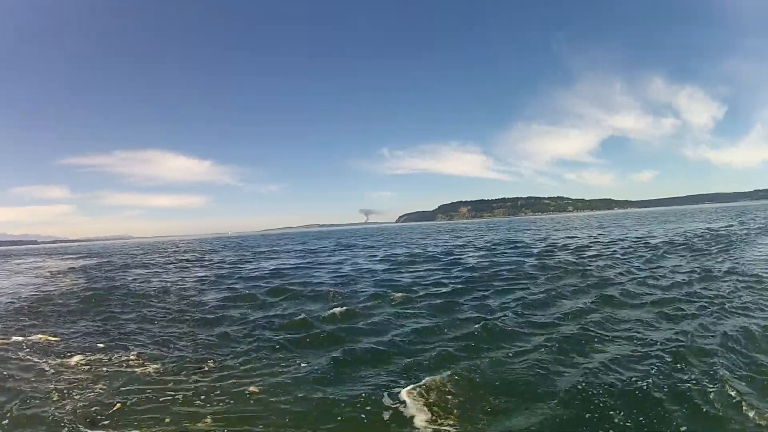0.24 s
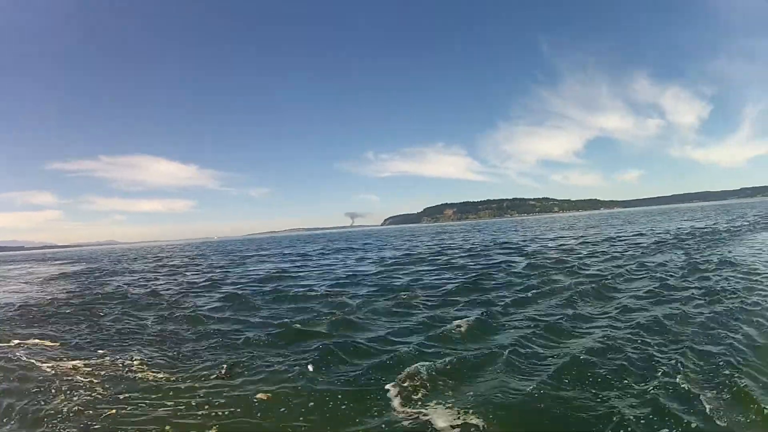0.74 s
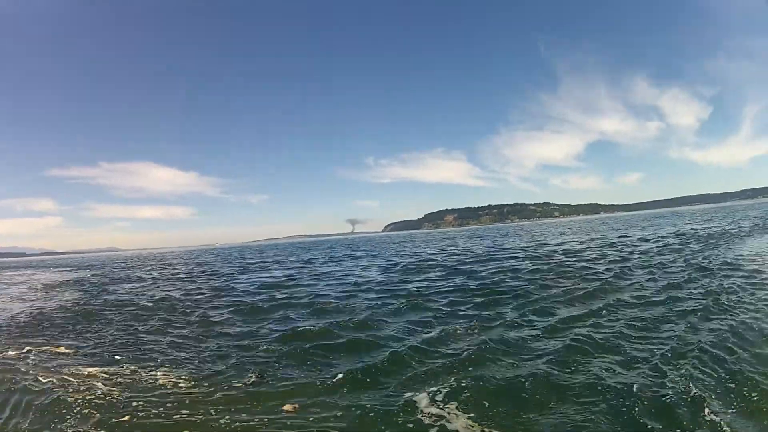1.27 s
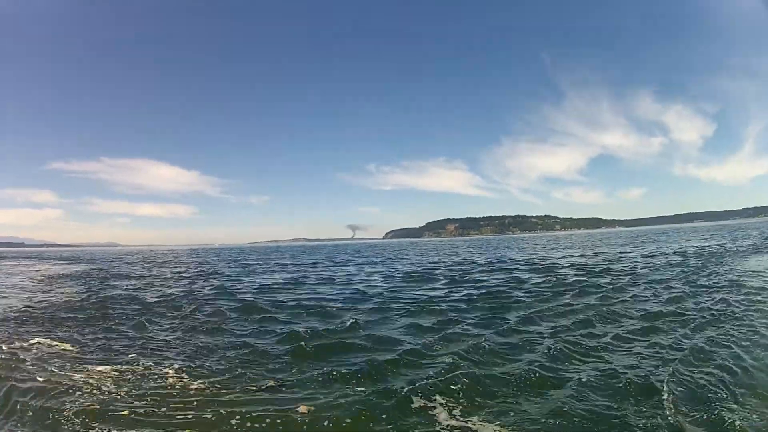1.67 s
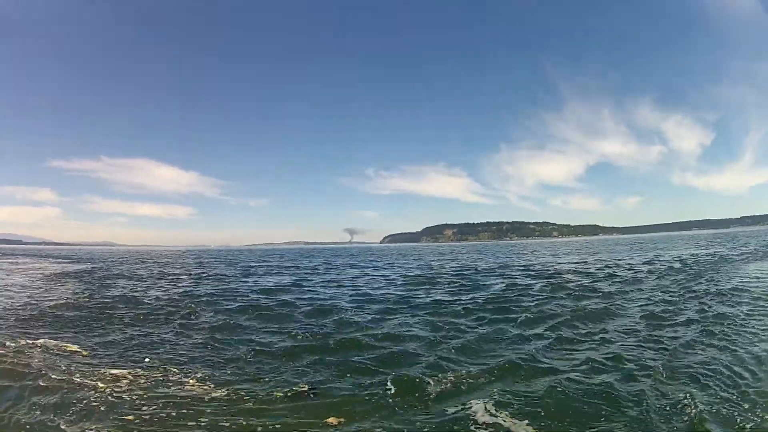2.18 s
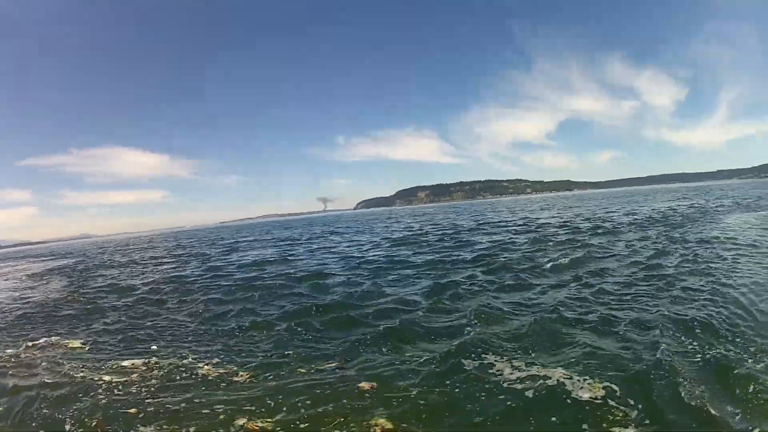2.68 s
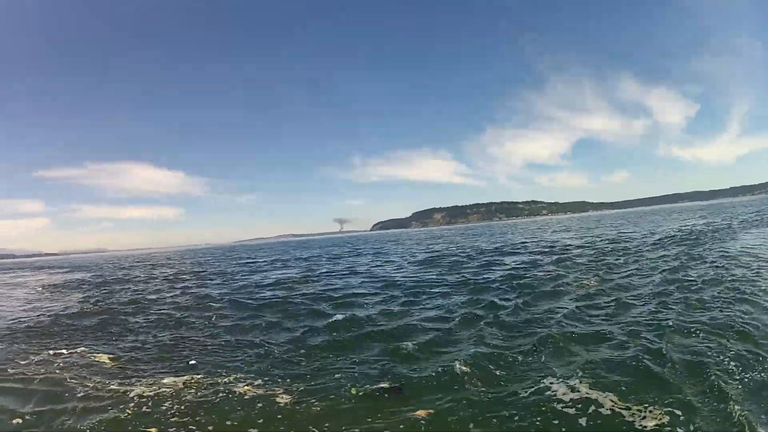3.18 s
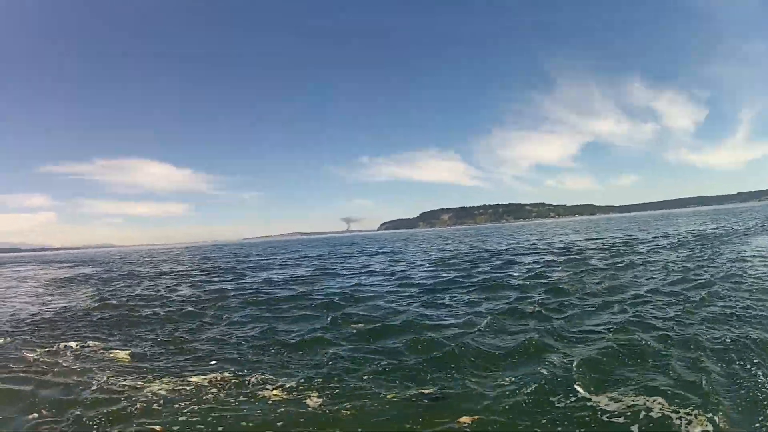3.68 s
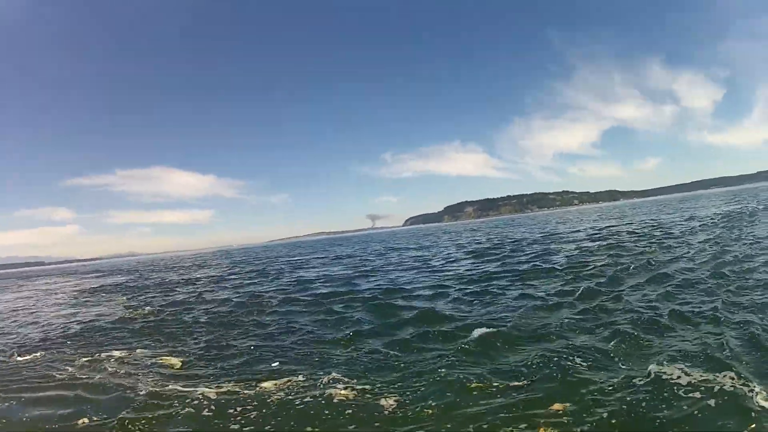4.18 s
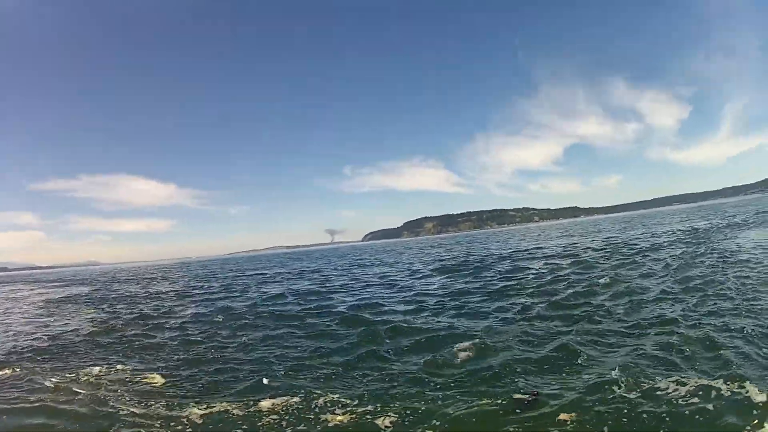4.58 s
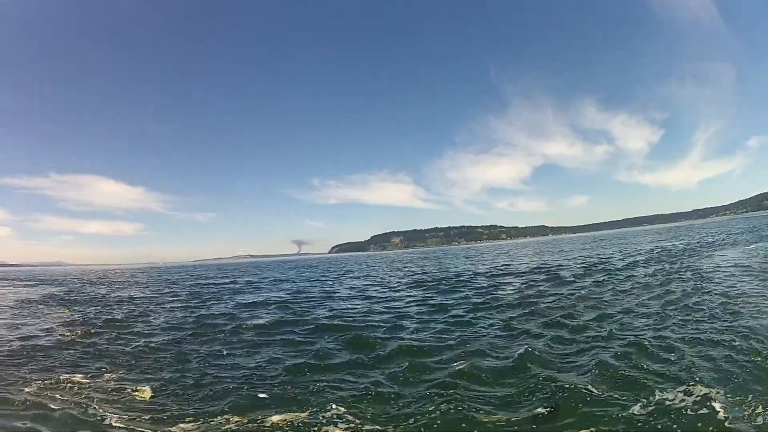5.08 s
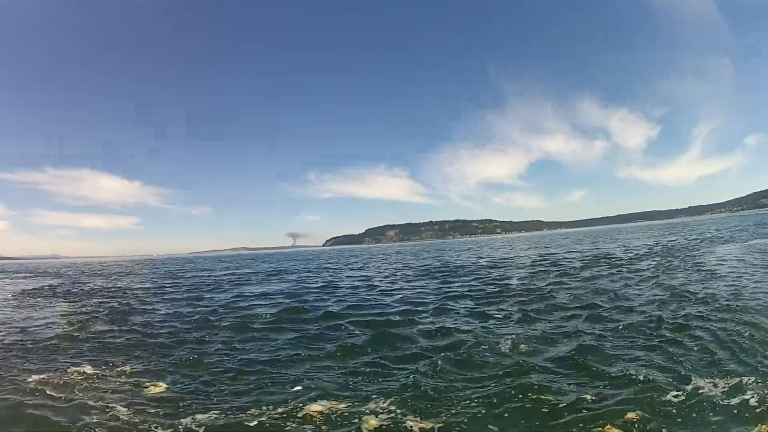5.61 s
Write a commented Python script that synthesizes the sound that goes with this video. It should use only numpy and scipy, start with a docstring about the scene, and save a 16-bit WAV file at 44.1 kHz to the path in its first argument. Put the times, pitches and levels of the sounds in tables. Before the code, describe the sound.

Quiet open-water wash, then a sudden loud wave smack and splashing against a small boat's hull, fading into light laps, drips and ticks.

```python
"""Choppy water slaps and splashes on the hull of a small drifting boat, heard inside a waterproof case low on it.
A wave strikes, its spray rains back, a second surge gulps as it drains; smaller laps and a lighter splash follow.
Splashes and slaps are random impacts filtered by the resonances of the case; gulps and drips are ringing air
bubbles that rise in pitch; dry ticks are crackles of noise. Under them lies a faint wash of far ripples
with a narrow hiss."""
import sys
import numpy as np
from scipy import signal
from scipy.io import wavfile
from scipy.ndimage import map_coordinates

SR = 44100
rng = np.random.default_rng(int(sys.argv[2]) if len(sys.argv) > 2 else 0)


def generate_wav(signal):
    """Clip the signal to [-1, 1] and save it as 16-bit WAV at the path in sys.argv[1]."""
    frames = np.transpose(np.atleast_2d(signal))
    scaled = np.clip(frames, -1, 1) * 32767
    pcm = np.round(scaled).astype(np.int16)
    wavfile.write(sys.argv[1], SR, pcm)


N = 257984
TIME = np.arange(N) / SR
BINS = np.fft.rfftfreq(4096, 1 / SR)  # frequencies of the filter curves, Hz

# Spectrum of the open water all around: [frequency_hz, relative_level_db]
WASH_SPECTRUM = [(12, -46), (20, -0.5), (41, -3.5), (64, -5.5), (121, -8), (143, -6.5), (347, -14.5),
                 (713, -26.5), (914, -26), (1420, -26.5), (2100, -27), (4950, -34), (6010, -37),
                 (7100, -37.5), (9300, -39.5), (9900, -37), (10800, -42.5), (15000, -41)]
# Level of the narrow hiss within the wash, before its slight flutter: [time_s, level_db]
HISS_LEVEL = [(0, -69.5), (.35, -73), (.75, -82.5), (2.4, -77), (5.85, -77)]
# Crisp ticks close to the microphone: [start_s, peak_db]
TICKS = [(0.177, -53), (0.3116, -40.5), (0.327, -47.5), (2.5145, -47.5), (3.736, -35), (3.7405, -34),
         (3.7673, -42), (4.359, -48), (4.3829, -39), (4.553, -49.5), (4.5953, -42), (5.6575, -40.5),
         (5.772, -40), (5.7802, -38)]
# Spectrum of a tick: [frequency_hz, relative_level_db]
TICK_SPECTRUM = [(1500, 5), (3200, -9), (4300, 6.5), (6000, -2.5), (8000, 1), (9500, -19), (15000, -26)]
# Single far drips: [start_s, level_db, pitch_hz, t60_s]
DRIPS = [(0.493, -52, 930, 0.038), (4.573, -50, 1670, .02)]
# Air pockets gulping under the hull; the rush of water is relative to the ring:
# [start_s, level_db, pitch_hz, t60_s, rise_octaves_per_s, rush_db]
GULPS = [(2.193, -41.5, 100, .08, 1, -13), (2.549, -39.5, 99, .07, 3, -6.5), (2.86, -32.5, 165, .05, 1, -7),
         (2.973, -16, 79, 0.027, 1, -27), (3.564, -25, 160, 0.18, 0.43, -5),
         (3.577, -26, 75.6, .15, 1.3, -7.5), (3.604, -30.5, 197.6, .16, 3, -5.5),
         (3.664, -36, 143.7, 0.29, 7.9, -8), (3.723, -30, 37.6, 0.1, 1, -17),
         (3.951, -40.5, 54, 0.095, 0.82, -7), (4.273, -45, 143, .04, 2, -5.5),
         (4.49, -35.5, 80.6, .24, 10.4, -33), (4.893, -29, 112, 0.025, 2, -15),
         (5.784, -24, 93, 0.05, 1, -20), (5.815, -39, 52, 0.13, 1.2, -22)]
# Waves running along the hull; splatter and fine spray are relative to the hollow body:
# [crest_s, level_db, swell_s, run_s, drain_s, splatter_db, spray_db]
WAVES = [ (2.679, -53, .03, .01, 0.039, -11, -12.5), (2.815, -51, 0.25, .04, .03, -14, -11.5),
         (2.864, -24, 0.0089, .006, 0.045, -6.5, -14), (2.896, -26, 0.032, 0.0086, 0.15, -7.5, -6.5),
         (2.99, -36, 0.088, 0.0058, 0.029, -7.5, -4.5), (3.07, -37, 0.25, 0.13, 0.44, -5, -5),
         (3.27, -40, 0.16, 0.032, 0.072, -.5, -3), (3.392, -29, 0.036, 0.037, 0.055, -6, -6.5),
         (3.497, -29.5, .06, .03, 0.031, -2, -8.5), (3.554, -32.5, 0.17, 0.027, 0.086, -1.5, -3.5),
         (3.67, -41.5, 0.18, 0.043, 0.094, -8.5, -12), (3.78, -50.5, 0.2, .15, 0.28, -6.5, -5),
         (3.913, -56.5, 0.053, 0.02, .04, 3.5, 5.5), (4.145, -59, 0.036, .018, 0.018, -14.5, -12),
         (4.8, -57, 0.17, 0.034, .05, -23, -13), (4.92, -62.5, 0.018, 0.074, 0.36, -10, -13),
         (5.18, -58.5, 0.033, 0.017, 0.017, -3.5, -5.5), (5.398, -51, 0.029, 0.015, 0.06, 3.5, 3),
         (5.455, -54, 0.079, 0.15, 0.35, -2.5, -4.5), (5.495, -52, 0.024, 0.01, .06, -15, -6),
         (5.715, -55, 0.25, 0.08, 0.039, -9.5, -7)]
# Chop that keeps trickling on the hull between waves: [time_s, level_db]
CHOP_LEVEL = [(2.45, -79), (2.58, -73.5), (3.7, -69), (3.97, -59), (4.12, -68.5), (4.6, -69), (5.3, -65),
              (5.85, -65)]
# Spectrum of heavy splashing: [frequency_hz, relative_level_db]
SHEET_SPECTRUM = [(60, -16.5), (340, -20.5), (550, -10), (850, -4), (1300, -6), (1600, -12.5), (2100, -9.5),
                  (2700, -15), (3500, -16), (4200, -17), (5500, -22.5), (9000, -28), (13500, -31.5),
                  (15500, -30)]
# Spectrum of light trickling: [frequency_hz, relative_level_db]
TRICKLE_SPECTRUM = [(60, -26), (400, -21), (700, -10.5), (1060, -4), (1450, -11), (2000, -9), (2700, -17.5),
                    (3300, -15.5), (4050, -18), (4700, -28.5), (8100, -28.5), (11000, -30), (15500, -33)]
# Spectrum of the deep churning: [frequency_hz, relative_level_db]
CHURN_SPECTRUM = [(15, 3.5), (45, 5), (150, -1.5), (300, -7), (500, -7), (800, -14), (2000, -62)]
# Wavelets slapping the hull: [start_s, level_db, brightness_db_per_octave, decay_s]
SLAPS = [(2.549, -57.5, -14, 0.0078), (2.656, -47, -2, .009), (2.768, -45.5, -0.5, .003),
         (2.834, -33.5, -14, 0.0011), (2.859, -18.5, 2, 0.0018), (2.866, -23.5, 1.5, 0.0056),
         (2.894, -19, -1, 0.0045), (3.385, -30.5, 0, 0.0058), (3.454, -33.5, 3.5, 0.0033),
         (3.493, -33, 1, 0.0024), (3.579, -25, 0, 0.0041), (3.653, -35, 0, 0.0015),
         (3.711, -35.5, 1.5, 0.0035), (3.933, -46, 1, 0.0066), (4.077, -44.5, -0.5, 0.0026),
         (4.2305, -47.5, 0, 0.0038), (4.273, -53.5, -0.5, 0.019), (4.348, -53, 0.5, 0.0095),
         (4.385, -51.5, 1, 0.0064), (4.437, -55.5, 1, 0.016), (4.893, -45.5, -1.5, 0.0063),
         (5.083, -49, 1.5, 0.014), (5.203, -47, -2.5, 0.0026), (5.24, -57, -3, .008),
         (5.304, -49.5, 2.5, 0.0056), (5.392, -44, -1, 0.0042), (5.401, -38, 3, 0.0023),
         (5.7855, -35.5, 0.5, 0.0029)]
# Peaks and dips of the wetted case; each sound scales their depth: [frequency_hz, width_hz, unscaled_db]
CASE_RESONANCES = [(652, 210, 4), (839, 67, 5), (935, 133, 8.5), (1070, 110, 7), (1247, 120, 7),
                   (1440, 170, -1), (1610, 190, 3.5), (1950, 520, 5), (2194, 53, 0.5), (2430, 87, -15),
                   (2790, 24, 6.5), (3370, 280, 3.5), (4120, 110, -9.5), (4122, 176, 12), (4800, 100, -3),
                   (5210, 220, 5), (6790, 200, 5.5), (7870, 270, 8), (8630, 360, 8), (9470, 180, 2.5),
                   (10050, 310, 10.5), (10960, 520, 11.5), (12960, 400, 13), (14300, 280, -3),
                   (13800, 170, 10), (14200, 430, 14)]
# Dips in the overall tone, narrow dull notches near 6 and 12 kHz: [frequency_hz, width_hz, gain_db]
TONE_DIPS = [(6000, 580, -13.5), (12050, 500, -18)]

WASH_DB = -59  # rms
HISS_HZ, HISS_HALF_WIDTH_HZ = 2100, 125
SWING_DB = 23.5  # a wave gains this much over its swell time and loses it again over its drain time
SAG_DB_PER_S = 25  # a wave weakens slowly from its crest on
SPRAY_DRAIN_RATIO = 0.84  # drain time of the fine spray relative to the wave's
CHOP_SPLATTER_DB, CHOP_SPRAY_DB = -5.5, -8  # relative to the body of the chop
CLUMP_DB, CLUMPS_PER_S = 1.08, 60  # body and splatter each come in clumps of their own
BODY_TOP_HZ, SPLATTER_TOP_HZ = 1500, 2450  # spray lies above the splatter
EDGE_HZ = 15450  # upper band limit


def amp(db):
    """Decibel law: 20 dB is a tenfold amplitude."""
    return 10 ** (np.asarray(db) / 20)


def evened(x):
    """Normalization: scales a signal to rms 1."""
    return x / np.sqrt(np.mean(x ** 2) + 1e-20)


def add(mix, start_s, sound):
    """Superposition: adds a sound to the mix from its start time."""
    part = mix[max(round(start_s * SR), 0):][:len(sound)]
    part += sound[:len(part)]


def slope(points):
    """Spectral envelope: levels in dB joined on a log-frequency axis."""
    hz, db = np.transpose(points)
    return np.interp(np.log(BINS + 1), np.log(hz), db)


def bells(rows):
    """Resonance: a sum of bell-shaped peaks and dips in dB."""
    return sum(db / (1 + (2 * (BINS - hz) / width) ** 2) for hz, width, db in rows)


def colour(x, shape_db):
    """Minimum-phase filtering: the spectrum's ringing follows an impact, never precedes it."""
    log_gain = np.log(amp(np.maximum(shape_db, -100)))
    circle = np.concatenate([log_gain, log_gain[-2:0:-1]])
    # the Hilbert transform of the log gain gives the phase
    ring = np.fft.ifft(np.exp(np.conj(signal.hilbert(circle)))).real
    return signal.oaconvolve(x, ring)[:len(x)]


def band(x, lo_hz, hi_hz):
    """Band-pass filtering: keeps the frequencies between two edges."""
    return signal.sosfilt(signal.butter(4, [lo_hz, hi_hz], "band", fs=SR, output="sos"), x)


def below(x, hz):
    """Zero-phase low-pass filtering: the part of a sound under a frequency, without delay."""
    return signal.sosfiltfilt(signal.butter(6, hz, fs=SR, output="sos"), x)


def wander(per_s):
    """Slow random modulation: a smooth curve of rms 1 through per_s random knots a second."""
    knots = rng.standard_normal(4000)
    return evened(map_coordinates(knots, [TIME * per_s], order=3, mode="wrap"))


def drops(per_s, spread_db):
    """Random impulse train: impacts at chance times, most small and a few large."""
    size = amp(spread_db * np.minimum(rng.exponential(1, N), 4))
    sign = rng.choice([-1., 1.], N)
    landed = rng.random(N) < per_s / SR
    return evened(size * sign * landed)


def bubble(hz, t60, rise, onset_s):
    """Bubble oscillation: a decaying ring whose pitch rises, by an octave at most, as it nears the surface."""
    t = np.arange(0, abs(t60) + 0.018, 1 / SR)
    turns = np.cumsum(hz * 2 ** np.minimum(rise * t, 1)) / SR
    onset = 1 - np.exp(-t / onset_s)
    return np.sin(2 * np.pi * turns) * amp(-60 * t / t60) * onset


def bubbles(per_s, cycles, rise, count=30):
    """Bubble ensemble: random small bubbles of many sizes, each decaying by 60 dB in so many cycles."""
    out = np.zeros(N)
    for hz in np.geomspace(700, 2300, count):
        ring = evened(bubble(hz, cycles / hz, rise, onset_s=0.00063)) * np.sqrt(hz)
        out += signal.oaconvolve(drops(per_s / count, spread_db=5.0), ring)[:N]
    return evened(out)


def wash():
    """Incoherent superposition: countless far ripples blend into a soft, swelling wash with a narrow hiss."""
    swelling_db = 0.5 * wander(per_s=9) + 0.94 * wander(per_s=45)
    ripples = drops(per_s=15000, spread_db=3.5) * amp(swelling_db)
    ripples = ripples + amp(-24) * bubbles(per_s=80, cycles=45, rise=4)
    open_water = evened(colour(ripples, slope(WASH_SPECTRUM) + 0.25 * bells(CASE_RESONANCES)))
    hiss_shape_db = -20 * np.log10(1 + ((BINS - HISS_HZ) / HISS_HALF_WIDTH_HZ) ** 2)
    hiss = evened(colour(rng.standard_normal(N), hiss_shape_db))
    hiss_db = np.interp(TIME, *np.transpose(HISS_LEVEL)) + 1.5 * wander(per_s=24)
    return amp(WASH_DB) * open_water + amp(hiss_db) * hiss


def ticks():
    """Impulsive excitation: tiny dry ticks, each a millisecond or two of crackle."""
    out, t = np.zeros(N), np.arange(1024) / SR
    for start_s, peak_db in TICKS:
        crackle = rng.standard_normal(len(t)) * t * np.exp(-t / 0.00054)
        tick = colour(crackle, slope(TICK_SPECTRUM))
        add(out, start_s, amp(peak_db) * tick / abs(tick).max())
    return out


def drips():
    """Bubble entrainment: lone drops fall back into the sea, each leaving one ringing bubble."""
    out = np.zeros(N)
    for start_s, db, hz, t60 in DRIPS:
        add(out, start_s, amp(db) * bubble(hz, t60, rise=3.5, onset_s=0.001))
    return out


def gulps():
    """Cavity oscillation: large air pockets between wave and hull ring as a short rush of water closes on them."""
    out = np.zeros(N)
    for start_s, db, hz, t60, rise, rush_db in GULPS:
        ring = bubble(hz, t60, rise, onset_s=0.0019)
        fade = amp(-60 * np.arange(len(ring)) / SR / t60)
        # the end of the noise is taken, after the filter has settled
        rush = evened(band(rng.standard_normal(SR), lo_hz=107, hi_hz=503))[-len(ring):]
        add(out, start_s, amp(db) * (ring + amp(rush_db) * rush * fade))
    return out


def heaviness(db):
    """Crossover by level: 0 for a light trickle, 1 for a solid sheet of water."""
    return np.clip((db + 54.5) / 14, 0, 1)


def trickle_colour():
    """Resonant filtering: the spectrum of light drops, shaped by the case."""
    return slope(TRICKLE_SPECTRUM) + 1.18 * bells(CASE_RESONANCES)


def sheet_colour():
    """Resonant filtering: the spectrum of a sheet of water, shaped slightly more deeply by the case."""
    return slope(SHEET_SPECTRUM) + 1.24 * bells(CASE_RESONANCES)


def flow():
    """Power summation: waves that swell, run and drain join the chop in dB levels of body, splatter and spray."""
    chop_db = np.interp(TIME, *np.transpose(CHOP_LEVEL))
    body = amp(chop_db) ** 2
    splatter = amp(chop_db + CHOP_SPLATTER_DB) ** 2
    spray = amp(chop_db + CHOP_SPRAY_DB) ** 2
    for crest_s, db, swell_s, run_s, drain_s, splatter_db, spray_db in WAVES:
        age = TIME - crest_s
        swelling_db = SWING_DB * np.minimum(age, 0) / max(swell_s, 0.002)
        running_db = db + swelling_db - SAG_DB_PER_S * np.maximum(age, 0)
        drained_db = SWING_DB * np.maximum(age - run_s, 0) / max(drain_s, 0.002)
        body = body + amp(running_db - drained_db) ** 2
        splatter = splatter + amp(running_db - drained_db + splatter_db) ** 2
        spray = spray + amp(running_db - drained_db / SPRAY_DRAIN_RATIO + spray_db) ** 2
    body_db, splatter_db, spray_db = 10 * np.log10([body, splatter, spray])
    body_db = body_db + CLUMP_DB * wander(CLUMPS_PER_S)
    splatter_db = splatter_db + CLUMP_DB * wander(CLUMPS_PER_S)
    return body_db, splatter_db, spray_db


def splashing():
    """Modulated impact noise: clumps of drops and bubbles ring the case while water churns against the hull."""
    body_db, splatter_db, spray_db = flow()
    impacts = drops(per_s=9000, spread_db=3.0) + amp(-15) * bubbles(per_s=700, cycles=62, rise=10.4)
    # a trickle comes in separate clumps; a heavy sheet of water is more even
    patter = impacts + drops(per_s=1500, spread_db=3.5)
    trickle = evened(colour(patter * amp(2.0 * wander(per_s=120)), trickle_colour()))
    sheet = evened(colour(impacts * amp(0.42 * wander(per_s=300)), sheet_colour()))
    heavy = heaviness(body_db)
    water = heavy * sheet + (1 - heavy) * trickle
    # three bands, each following its own level
    body = below(water, BODY_TOP_HZ)
    unsprayed = below(water, SPLATTER_TOP_HZ)
    splash = amp(body_db) * evened(body)
    splash += amp(splatter_db) * evened(unsprayed - body)
    splash += amp(spray_db) * evened(water - unsprayed)
    # in dB, the deep churning swells about half as much as the body above it
    churn = evened(colour(drops(per_s=900, spread_db=4.5), slope(CHURN_SPECTRUM)))
    return splash + amp(-25.5 + 0.54 * body_db) * churn


def slaps():
    """Impact excitation: a sheet of water lands quickly, then scatters into drops that die away."""
    out, t = np.zeros(N), np.arange(4096) / SR
    scatter = drops(per_s=12000, spread_db=0.0)
    octaves = np.log2(np.maximum(BINS, 400) / 1000)  # from 1 kHz, held below 400 Hz
    for k, (start_s, db, brightness, decay) in enumerate(SLAPS):
        decay = max(decay, 0.001)
        heavy = heaviness(db)
        envelope = np.exp(-t / decay) * (1 - np.exp(-t / (0.38 * decay)))
        blow = scatter[k * len(t):][:len(t)] * envelope
        case_db = heavy * sheet_colour() + (1 - heavy) * trickle_colour()
        burst = colour(blow, case_db + brightness * octaves)
        # the energy equals that of an rms-1 sound lasting one decay time
        add(out, start_s, amp(db) * burst * np.sqrt(decay * SR / np.sum(burst ** 2)))
    return out


def scene():
    """Linear superposition: all the water sums at one microphone."""
    return (wash() + ticks() + drips() + gulps() + splashing() + slaps())[None]


def record(dry):
    """Linear filtering: two notches in the overall tone, then the band limit."""
    heard = colour(dry[0], bells(TONE_DIPS))
    band_limit = signal.firwin(511, EDGE_HZ, window=("kaiser", 9), fs=SR)
    return signal.oaconvolve(heard, band_limit, "same")[None]


dry = scene()
out = record(dry)
generate_wav(out)
```